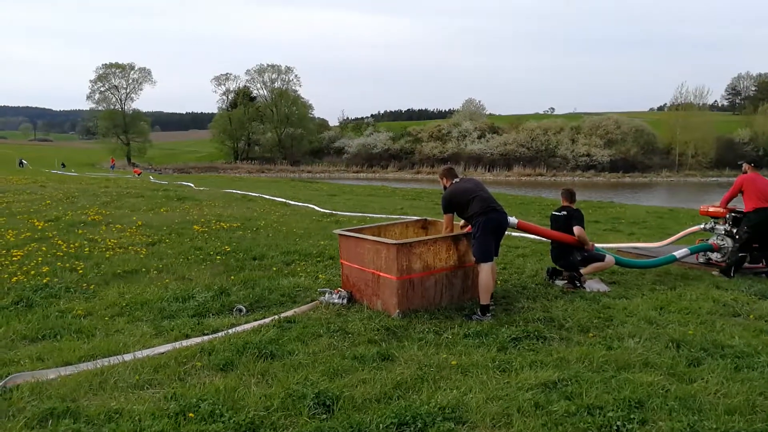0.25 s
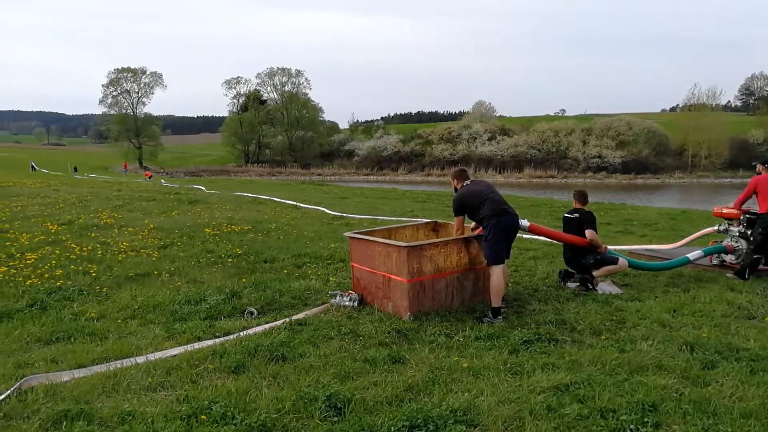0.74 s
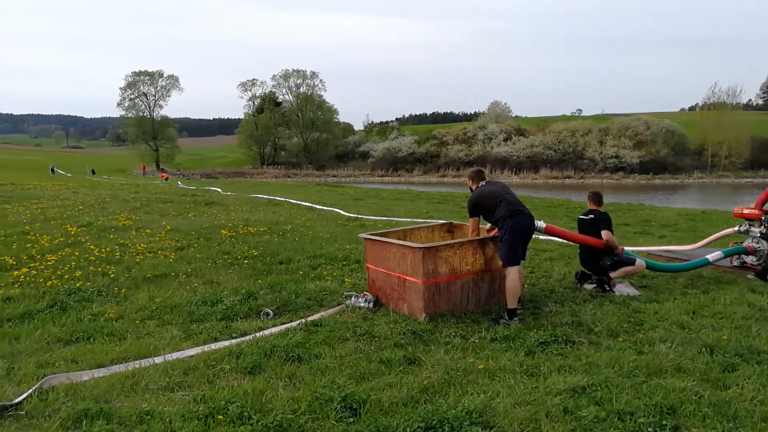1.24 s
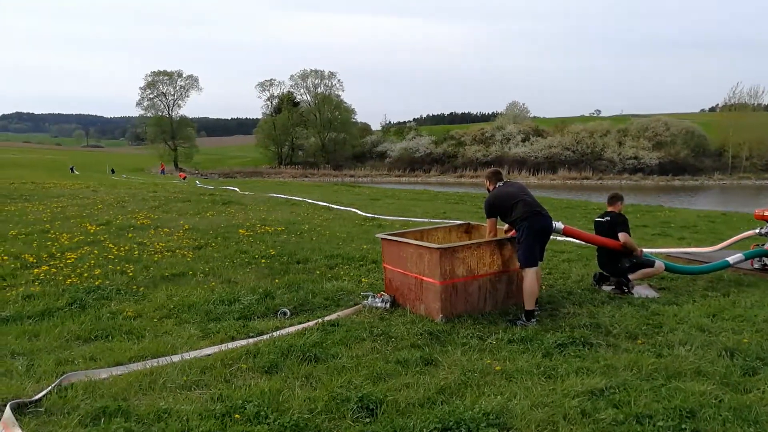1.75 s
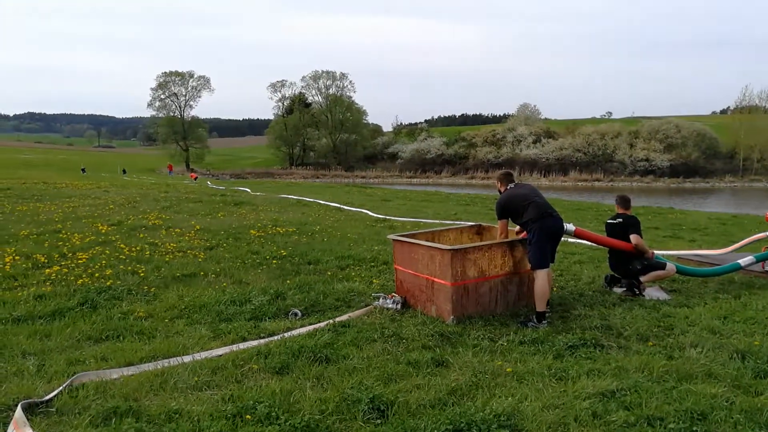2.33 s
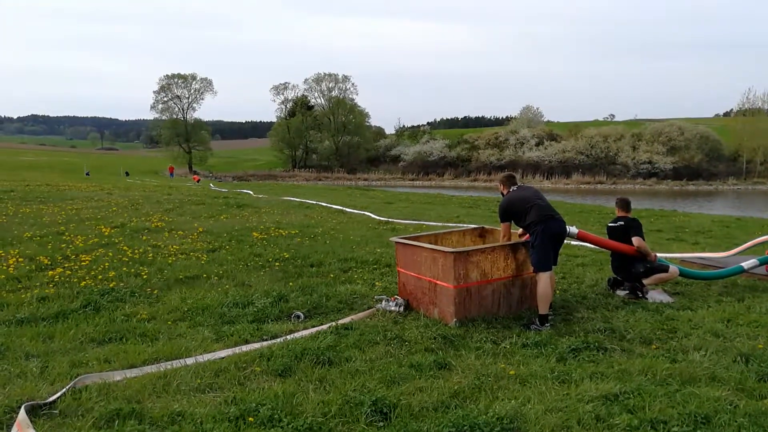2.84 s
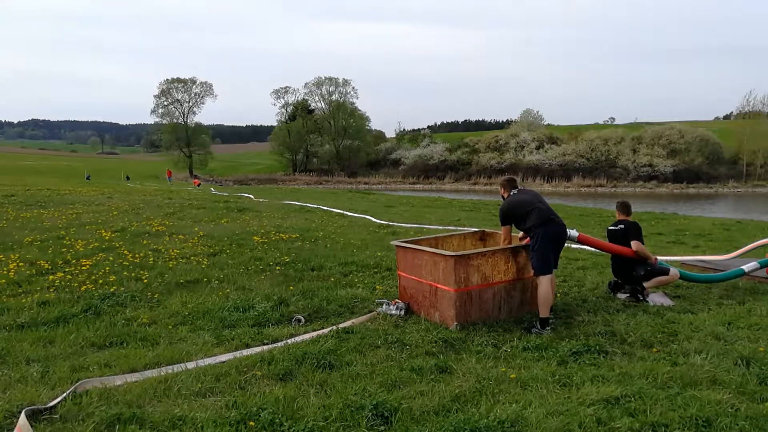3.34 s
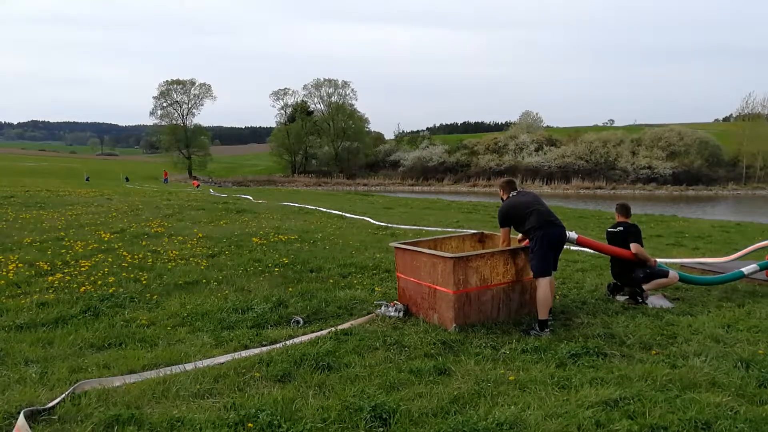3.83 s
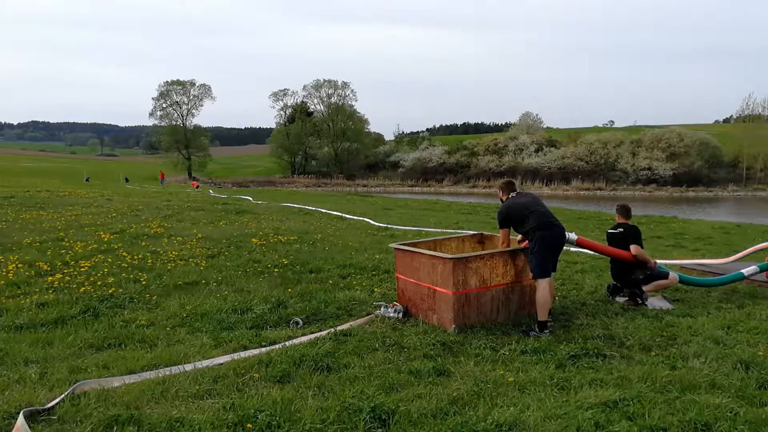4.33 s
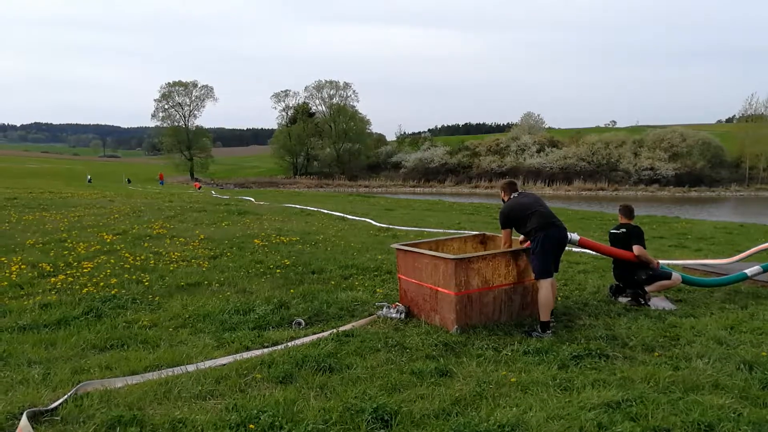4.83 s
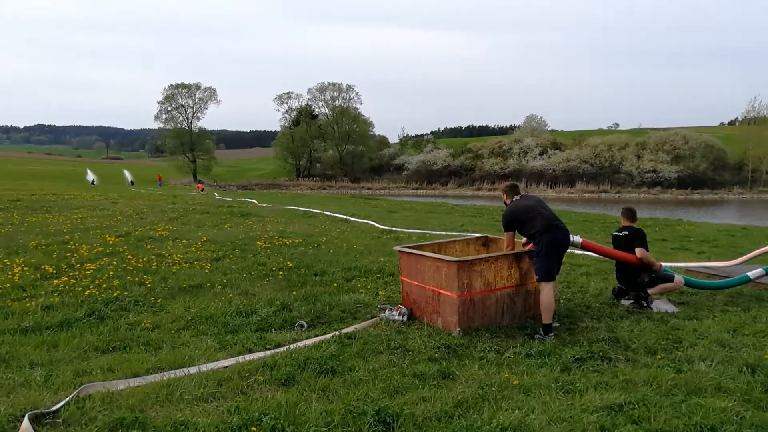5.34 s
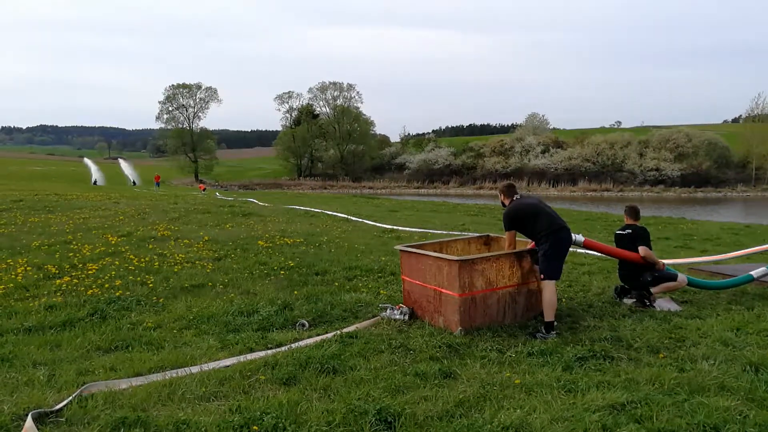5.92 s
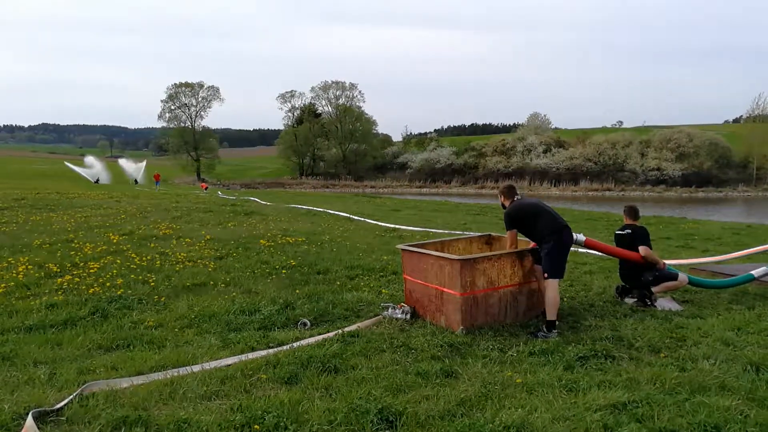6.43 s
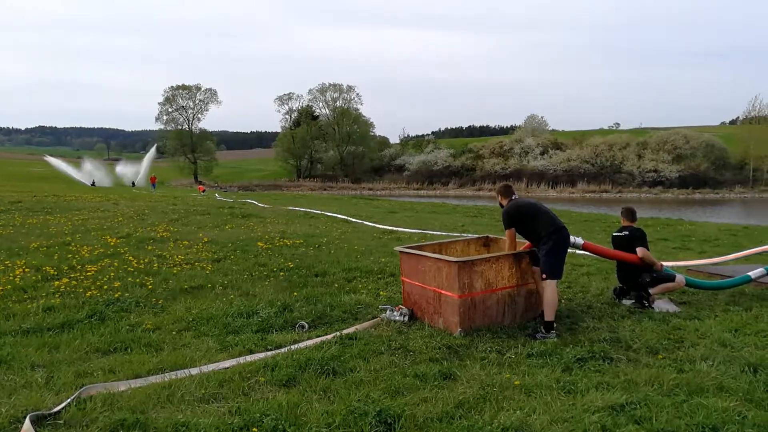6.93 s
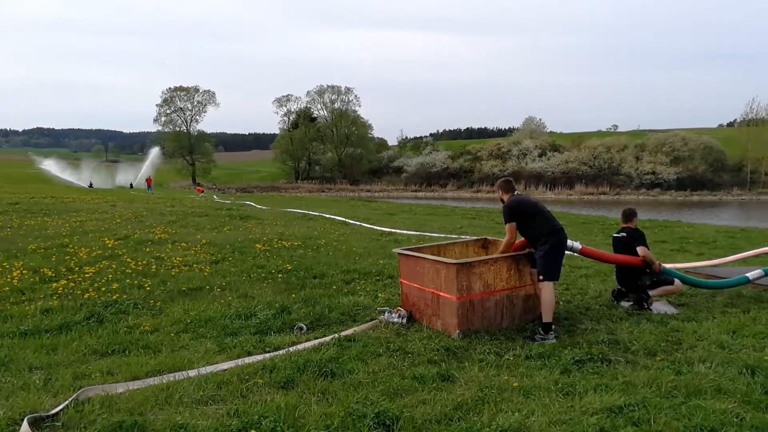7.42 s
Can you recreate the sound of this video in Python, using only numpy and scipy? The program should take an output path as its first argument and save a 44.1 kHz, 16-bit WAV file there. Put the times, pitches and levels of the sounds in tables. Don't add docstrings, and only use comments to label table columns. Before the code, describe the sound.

A four-cylinder petrol pump engine runs continuously under load on an open field. Low, throaty exhaust pulses merge into a buzzing drone, covered by rapid metallic clatter and sharp ticks. After nearly six seconds it revs up smoothly and settles at a higher pitch. Faint wind rumble lies beneath. Phone stereo, engine off to the right, no indoor echo.

```python
import sys
import numpy as np
from scipy import signal
from scipy.fft import rfft, irfft, next_fast_len
from scipy.io import wavfile

SR = 44100
rng = np.random.default_rng(int(sys.argv[2]) if len(sys.argv) > 2 else 0)


def nominal_scale(level):
    x = np.asarray(level, float) / 20
    return 10 ** x


def dump(signal):
    limited = np.clip(np.atleast_2d(signal).T, -1, 1)
    pcm = np.round(limited * 32767).astype(np.int16)
    wavfile.write(sys.argv[1], SR, pcm)


N = 338237

# time in seconds, firings per second.
SPEED = [(0.0, 104.47), (0.83, 104.38), (1.07, 105.15), (1.55, 104.39), (2.21, 104.17), (3.11, 104.98),
         (3.29, 104.03), (3.77, 105.55), (3.89, 104.87), (4.61, 105.97), (5.51, 106.03), (5.63, 106.8),
         (6.11, 115.86), (6.65, 124.09), (6.71, 123.35), (7.19, 124.11), (7.37, 122.15), (7.67, 124.5)]
LOW_HZ, HIGH_HZ = 105, 123.5

# multiple of the firing rate, level at low speed in dB, level at high speed in dB.
EXHAUST_LINES = [(.5, -37, -38), (1, -4, -4), (1.5, -11.5, -16.5), (2, -0.5, 1.5), (2.5, -11.5, -11.5),
                 (3, -4, -10.5), (3.5, -17.5, -20), (4, -14.5, -19), (4.5, -21, -22), (5, -24, -24.5),
                 (5.5, -28, -31), (6, -39, -36.5), (6.5, -55, -38), (7, -27.5, -31), (7.5, -29, -39),
                 (8, -26, -32), (8.5, -28, -34.5), (9, -35, -56), (9.5, -29, -47), (10, -39, -40),
                 (10.5, -38, -28.5)]
# time in seconds, level in dB.
PULL = [(0.0, -17), (0.34, -16), (2.2, -16.5), (4.16, -15.5), (4.85, -17.5), (5.13, -16.5), (5.17, -18),
        (6.15, -14.5), (7.07, -14), (7.67, -15)]
# centre in seconds, change in dB.
STUMBLES = [(.05, -1.5), (2.265, -1.5), (3.27, -1.3), (3.73, -1.2), (4.78, -1.7), (4.815, -1.5),
            (6.056, -1.3), (7.403, -1.8)]
STUMBLE_S, UNEVEN_DB = .012, .25
PIPE_HZ, PIPE_WIDTH_HZ, PIPE_DB = 1015, 30, 7

CYLINDER_DB = [-2, 0, -2, 2.2]
# time in seconds, peak in dB, bark in dB, tick in dB.
HARD_CRACKS = [(0.0308, -15.5, -25, -30), (0.7966, -16, -39, -27), (0.9123, -25, -19, -33),
               (1.0261, -11, -31, -26), (1.1403, -17, -22, -17), (1.2166, -12, -27, -24),
               (1.3698, -13, -27, -26), (1.4456, -5, -28, -17), (1.5993, -10, -26, -23),
               (1.9824, -12, -30, -22), (2.0587, -10, -27, -16), (2.0976, -11, -20, -25),
               (2.2124, -5, -22, -22), (2.5197, -13, -21, -18), (3.1308, -8, -38, -19),
               (3.5134, -13, -32, -18), (3.5892, -13, -32, -15), (3.7419, -16, -35, -8),
               (4.2931, -17, -32, -14), (4.804, -21, -27, -25), (4.9546, -16, -21, -29),
               (5.1432, -14, -40, -2), (5.2565, -11, -33, -8), (5.2939, -8, -31, -11),
               (5.445, -12, -34, -14), (5.5957, -8, -32, -29), (7.1192, -15, -25, -40),
               (7.1841, -13, -19, -23), (7.216, -8, -29, -13), (7.2809, -9.5, -26, -16)]
# frequency in Hz, density in dB per Hz.
CRACK_COLOUR = [(450, -9.5), (700, -3.5), (1000, -2.5), (1500, -14.5), (2100, 5.5), (2750, -61), (3300, -6),
                (4400, 0.5), (5200, -5.5), (6400, -0.5), (7800, -4.5), (9600, -18.5), (10500, -39),
                (13300, -28), (15000, -37)]
# frequency in Hz, width in Hz, level in dB.
RINGS = [(1019, 40, -10), (2164, 350, 3.5), (3171, 204, 1), (3858, 197, -2), (4428, 120, 2), (4680, 163, 3),
         (5240, 150, -6), (6040, 97, -6.5), (6484, 100, -1), (7080, 290, -2), (7550, 99, -19),
         (10900, 900, -40)]
# time in seconds, rattle swing in dB.
RATTLE = [(0, 0), (.3, -1), (1.2, 1), (1.9, 1), (2.1, 0), (2.3, 2), (3.0, 0.3), (3.35, -1.5), (3.57, 1),
          (4.0, -2.5), (4.4, 1.5), (5.0, 1.8), (5.25, 1), (5.7, -0.5), (6.5, 0.9), (7.05, 0), (7.25, 1),
          (7.67, -2)]
RATTLE_CHANCE_DB = .5
# level in dB, share of the rattle swing, change at high speed in dB.
PARTS = [
    (-32, -0.22, .3),
    (-35.5, 0.39, -2.5),
    (-30, 1, -2.5),
    (-30, 1.51, -0.9),
]

# frequency in Hz, density in dB per Hz.
WIND_COLOUR = [(20, -14), (35, -16), (60, -9), (90, -4.5), (140, -6.5), (250, 2.5), (400, -6.5), (600, -17)]
# centre in seconds, change in dB.
GUSTS = [(1.05, -5), (1.3, 15), (1.5, 28), (2.22, 10), (2.38, -11), (2.9, 12), (3.58, 6), (4.22, -10),
         (4.6, -1), (5.11, 13), (5.85, 5), (6.88, 13)]
WIND_DB, GUST_S = -46, 0.056

# frequency in Hz, level in dB, phase lag beyond the path delay
FAR_PORT = [(90, 0, .03, 1), (340, 0, .5, .99), (560, -4, 1.6, .95), (760, -14, .9, .9),
            (1020, 0, -.3, .95), (1550, 7, 0, .87), (2100, 4, .9, .93), (2650, 6.5, 1.5, .82),
            (3100, -6, 2, .87), (3450, -8, 3, .75), (3850, -15, 6.2, .78), (5600, -6.5, 7.1, .82),
            (6700, -12, 7.2, .75), (9000, -8, 6.5, .68), (10500, -1, 7.1, .5), (15500, 0, 9, .35)]
PORT_DELAY_S = 10 / 44100
# frequency in Hz, width in Hz, depth from 0 to 1.
NOTCHES = [
    (8480, 110, 0.76),
    (10540, 360, 0.76),
    (12900, 1500, 0.5),
]


def rms_one(x):
    return x / np.sqrt(np.mean(x ** 2) + 1e-20)


def in_time(rows):
    s, *columns = np.transpose(rows)
    return [np.interp(np.arange(N) / SR, s, column) for column in columns]


def at_hz(points, hz, axis=1):
    points = np.array(points)
    return np.interp(np.log(hz + 1), np.log(points[:, 0]), points[:, axis])


def bumps(events, half_s):
    s = np.arange(N) / SR
    return sum(step_db * np.exp(-((s - at) / half_s) ** 2) for at, step_db in events)


def drift(rate):
    r = np.exp(-80 * np.pi * rate / SR)
    noise = rng.standard_normal(N // 40 + 2002)
    slow = signal.lfilter([1], [1, -2 * r, r * r], noise)[2000:]
    return np.interp(np.arange(N) / 40, np.arange(len(slow)), rms_one(slow))


def band(x, low, high):
    return signal.sosfilt(signal.butter(2, [low, min(high, .45 * SR)], "band", fs=SR, output="sos"), x)


def resonance(x, hz, width):
    r = np.exp(-np.pi * width / SR)
    poles = [1, -2 * r * np.cos(2 * np.pi * hz / SR), r * r]
    return signal.lfilter([(1 - r * r) / 2, 0, (r * r - 1) / 2], poles, x)


def speed_share(per_s):
    return np.clip((per_s - LOW_HZ) / (HIGH_HZ - LOW_HZ), 0, 1)


def stumbles():
    return UNEVEN_DB * drift(60) + bumps(STUMBLES, STUMBLE_S)


def exhaust(firings, per_s, level_db, wobble_db, throb_db):
    fast = speed_share(per_s)
    early, skew = .6 + .8 * fast, .4 + .9 * fast
    jitter = .014 * (1 + fast) * drift(25)
    turn = 2 * np.pi * firings + np.pi + early + jitter
    throb = throb_db * drift(30) + .7 * stumbles()
    blur = .001 + .004 * fast ** 4
    out = np.zeros(N)
    for k, low_db, high_db in EXHAUST_LINES:
        k = round(2 * k) / 2
        uneven = 1.25 * (k % 1 > 0)
        echo = .2 * k * np.cos(np.pi * k) * (1 - fast)
        gain_db = low_db + (high_db - low_db) * fast
        gain_db = gain_db + np.sqrt(k) * (wobble_db * drift(3) + throb)
        gain_db = gain_db + PIPE_DB * np.exp(-((k * per_s - PIPE_HZ) / PIPE_WIDTH_HZ) ** 2)
        smear = blur * k ** 2 * drift(33)
        out += nominal_scale(gain_db) * np.cos(k * turn + smear + np.pi - skew + uneven + echo)
    return nominal_scale(level_db + 1.5) * out


def blow_strengths(count):
    strokes = count[-1] + 1
    strength = .8 * rng.standard_normal(strokes) + np.resize(np.roll(CYLINDER_DB, 1), strokes)
    tilt = np.zeros(strokes)
    usual_tilt = np.mean([tick_db - bark_db for _, _, bark_db, tick_db in HARD_CRACKS])
    for s, peak_db, bark_db, tick_db in HARD_CRACKS:
        stroke = count[min(round((s + .002) * SR), N - 1)]
        strength[stroke] = .6 * (peak_db + 18.5)
        tilt[stroke] = .4 * (tick_db - bark_db - usual_tilt)
    return strength, tilt


def cracks(firings, levels_db, floor_db, click_db):
    since = firings - .08
    per_s = np.gradient(firings * SR)
    count = np.floor(since).astype(int) + 1
    late_s = (since % 1) / per_s
    strength, tilt = blow_strengths(count)
    white = rng.standard_normal((2, 2, N))
    starts = np.flatnonzero(np.diff(count)) + round(.0016 * SR)

    def burst(hz, noise, hum_db=0):
        own = min(hz / 1200, 2.3) * rng.standard_normal(len(strength))
        own = own + tilt * np.clip(np.log2(hz / 4500), -1, 1) * (hz < 9500)
        swell = (1 - np.exp(-late_s / .0009)) ** 3
        fall_s = 0.0021 + 0.00024 * np.log(hz / 1500) ** 2
        shape = swell * np.exp(-late_s / fall_s)
        click = np.zeros((2, N + 400))
        scatter = rng.integers(0, 70, (2, len(starts)))
        click[[[0], [1]], starts + scatter] = nominal_scale(click_db) * (2000 / hz) ** 0.053
        place = np.interp(np.log(hz), np.log([1200, 2200, 4500, 7500]), [0, 1, 2, 3])
        low = min(int(place), 2)
        level_db = levels_db[low] + (place - low) * (levels_db[low + 1] - levels_db[low])
        together = np.interp(hz, [800, 2000, 8500, 11000], [.1, .85, 1.15, .25])
        blow_db = np.minimum(together * strength + own, 7.5)
        blow = nominal_scale(blow_db)[count] * (shape * noise + click[:, :N])
        hiss = nominal_scale(floor_db + hum_db + 5 * (hz > 9500) + 4 * (hz < 1900)) * noise
        return nominal_scale(level_db + 1.1 * drift(1.5)) * (hiss + blow)

    hum_db = 2 + .25 * (per_s - LOW_HZ)
    edges, out = 420 * 2 ** np.arange(0, 5.4, 1 / 3), 0
    for k, (low, high) in enumerate(zip(edges, edges[1:])):
        hz = np.sqrt(low * high)
        out = out + nominal_scale(at_hz(CRACK_COLOUR, hz) + 23) * band(burst(hz, white[k % 2]), low, high)
    for k, (hz, width, top_db) in enumerate(RINGS):
        ring = resonance(burst(hz, white[k % 2], hum_db), hz, width)
        out = out + nominal_scale(top_db + 25.5) * resonance(ring, hz, 3 * width)
    return out


def gusts():
    return WIND_DB + bumps(GUSTS, GUST_S)


def wind_rumble(level_db, gust_db):
    hz = np.fft.rfftfreq(N, 1 / SR)
    shape = nominal_scale(at_hz(WIND_COLOUR, hz)) * (hz > 15) / (1 + (hz / 700) ** 4)
    noise = irfft(rfft(rng.standard_normal((2, N))) * shape, N)
    return nominal_scale(level_db + 0.38 * gust_db + 0.92 * drift(4.0)) * rms_one(noise)


def ports(near, twin):
    size = next_fast_len(N + 2048)
    hz = np.fft.rfftfreq(size, 1 / SR)
    shared = np.clip(at_hz(FAR_PORT, hz, axis=3), 0, 1)
    lag = 2 * np.pi * hz * PORT_DELAY_S + at_hz(FAR_PORT, hz, axis=2)
    path = nominal_scale(at_hz(FAR_PORT, hz)) * np.exp(-1j * lag)
    far = path * (shared * rfft(near, size) + np.sqrt(1 - shared ** 2) * rfft(twin, size))
    return np.array([irfft(far, size)[:N], near])


def scene():
    per_s, = in_time(SPEED)
    firings = np.cumsum(per_s) / SR
    fast = speed_share(per_s)
    exhaust_db, = in_time(PULL)
    rattle_db = in_time(RATTLE)[0] + RATTLE_CHANCE_DB * drift(9)
    levels_db = [level_db + share * rattle_db + fast_db * fast for level_db, share, fast_db in PARTS]
    tone = exhaust(firings, per_s, exhaust_db, wobble_db=.12, throb_db=.13)
    crack = cracks(firings, levels_db, floor_db=-21.5, click_db=14)
    wind = wind_rumble(level_db=-16.5, gust_db=gusts())
    own_wind = nominal_scale(-9) * wind[1] * [[1], [-1]]
    return ports(tone + crack[0] + wind[0], crack[1]) + own_wind


def top_cut(x):
    return signal.sosfilt(signal.butter(12, 16100, fs=SR, output="sos"), x)


def record(dry):
    for hz, width, depth in NOTCHES:
        dry = dry - np.clip(depth, 0, .9) * resonance(dry, hz, width)
    top = .98
    rounded = dry / (1 + (dry / top) ** 4) ** (1 / 4)
    cut = signal.sosfilt(signal.ellip(10, .5, 70, 15700, fs=SR, output="sos"), rounded)
    return top_cut(cut)


dry = scene()
out = record(dry)
dump(out)
```